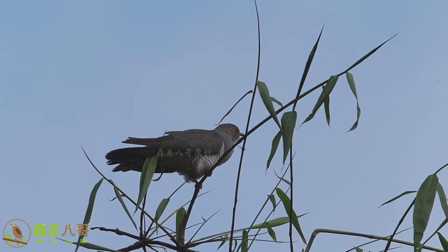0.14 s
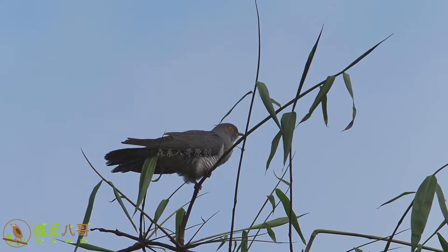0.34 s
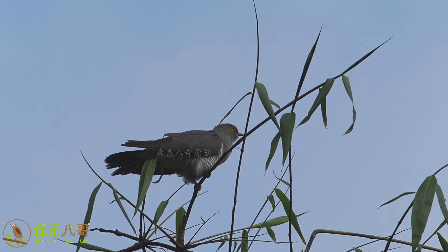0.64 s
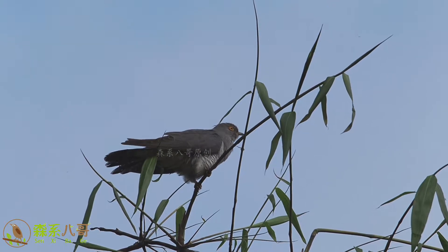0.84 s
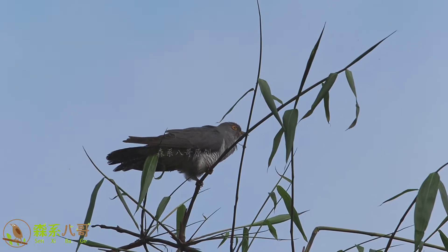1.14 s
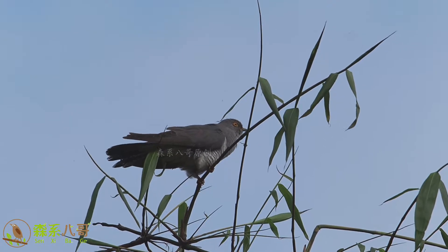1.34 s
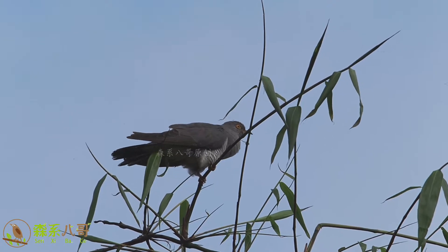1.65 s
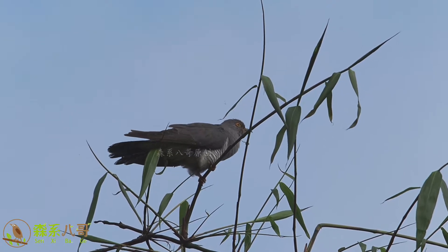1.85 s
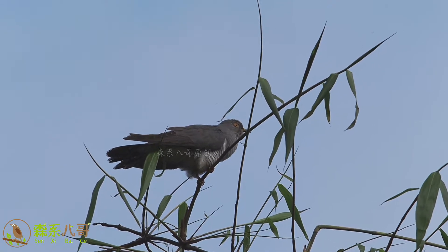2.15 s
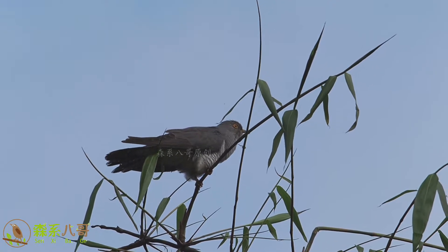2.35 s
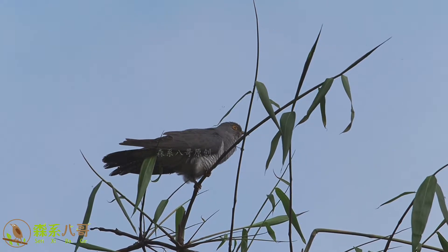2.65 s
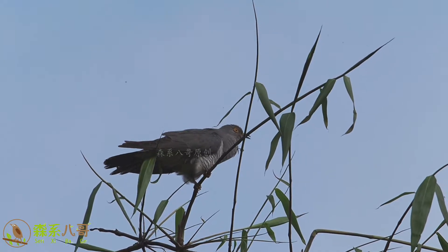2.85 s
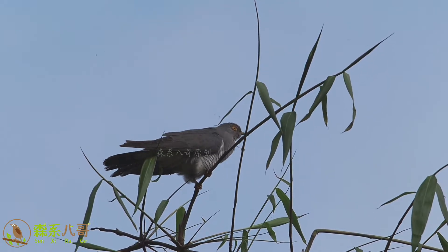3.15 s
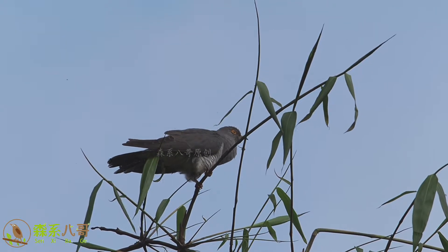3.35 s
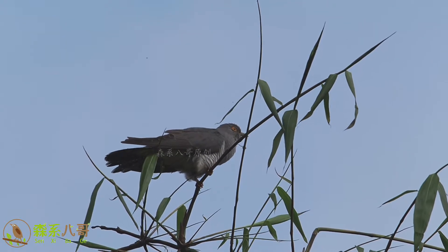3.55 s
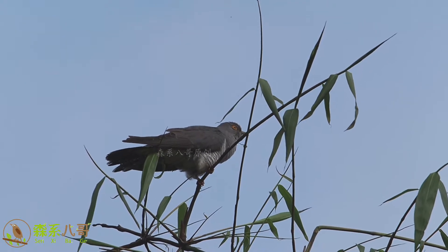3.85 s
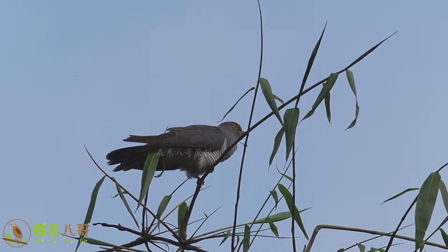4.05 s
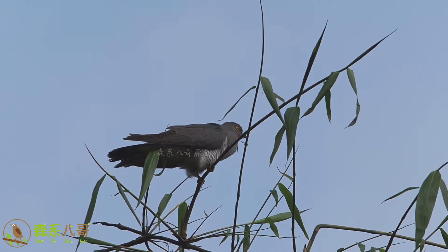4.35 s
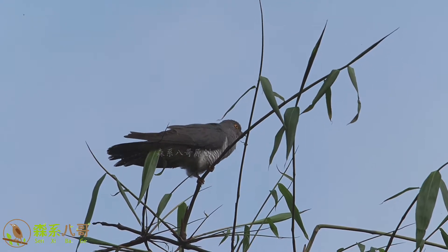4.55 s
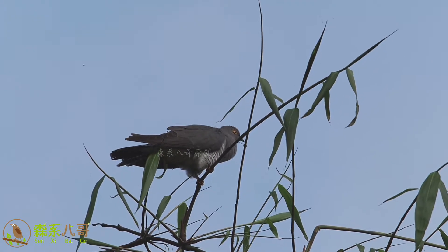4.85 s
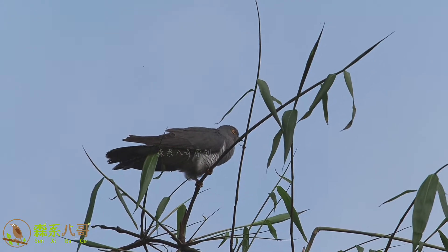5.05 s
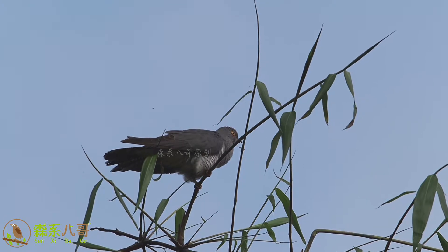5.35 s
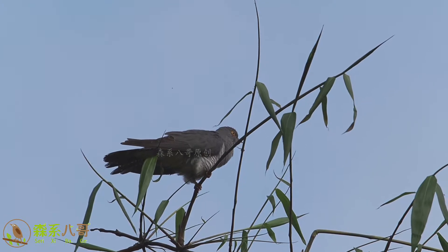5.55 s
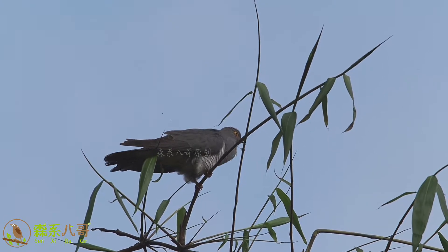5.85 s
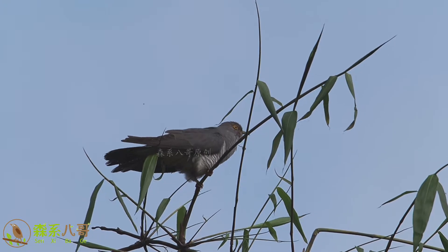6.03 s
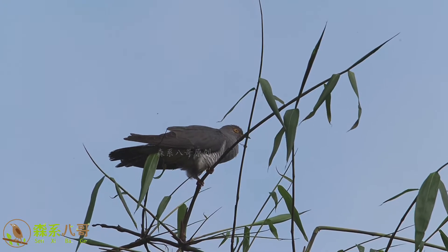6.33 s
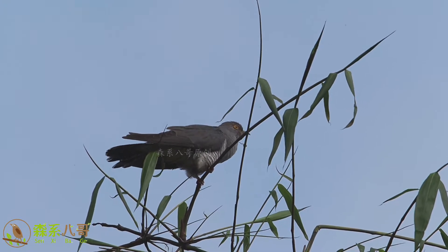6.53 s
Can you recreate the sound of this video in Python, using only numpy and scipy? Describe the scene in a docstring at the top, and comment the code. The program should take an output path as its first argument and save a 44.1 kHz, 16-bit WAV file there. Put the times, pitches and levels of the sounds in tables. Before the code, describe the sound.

Outdoors among reeds, a cuckoo calls four times, about every one and a half seconds: a short scooped higher note, then a lower, softer one, each with a slight echo. Behind it are a very quiet airy hush, faint insects and far small birds twittering and whistling. Near the end a closer bird gives a few sharp rising chips. The microphone hears the cuckoo clearly in front.

```python
"""Cuckoo over a reed bed

A cuckoo calls four times from a reed top: a scooped high note, then a lower, softer one; an earlier call still echoes.
Each note is a gliding, nearly pure tone; delayed copies interfere with it and late scattering leaves a short tail.
Far small birds whistle, chip and twitter as swept sines blurred by scattering, with hoarse calls of band noise.
Beneath lie shaped noises (a soft outdoor hush, a high hiss, an insect chorus) and a thin insect whine of sines."""
import sys
import numpy as np
from scipy import signal
from scipy.fft import rfft, irfft
from scipy.io import wavfile

SR = 44100
rng = np.random.default_rng(int(sys.argv[2]) if len(sys.argv) > 2 else 0)


def generate_wav(sig):
    """Save sig (samples, or channels by samples) to the path in sys.argv[1] as 16-bit PCM at SR."""
    pcm = np.round(np.clip(np.atleast_2d(sig).T, -1, 1) * 32767).astype(np.int16)
    wavfile.write(sys.argv[1], SR, pcm)


N = 295029
TIME = np.arange(N) / SR


def from_db(db):
    """Logarithmic level: 20 dB is a tenfold amplitude."""
    return 10 ** (np.asarray(db) / 20)


def rms_one(x):
    """Normalisation: divide by the root mean square to reach unit power."""
    return x / np.sqrt(np.mean(x ** 2) + 1e-20)


def progress(length_s):
    """Normalised time: from 0 to 1 over a note's length."""
    return np.linspace(0, 1, max(8, round(length_s * SR)))


def at_hz(points, hz):
    """Logarithmic frequency scale: interpolate a curve evenly per octave."""
    known_hz, values = np.transpose(points)
    return np.interp(np.log(hz + 1e-3), np.log(known_hz), values)


def wander(rate_hz, size=N):
    """Random modulation: straight lines between random knots, rate_hz knots a second, scaled to unit power."""
    steps = np.arange(size) / SR * rate_hz
    knots = rng.standard_normal(16384)
    return rms_one(np.interp(steps, np.arange(len(knots)), knots))


def band_noise(noise, order, low_hz, high_hz):
    """Resonance: a band-pass filter keeps one region of a noise."""
    band = signal.butter(order, [low_hz, high_hz], "band", fs=SR, output="sos")
    return signal.sosfilt(band, noise)


def stereo_noise(spectrum):
    """Interaural correlation: sum and difference of two noises set how alike the ears are at each frequency."""
    # likeness of left and right: frequency_hz, correlation
    likeness = [(40, 0.74), (130, 0.28), (290, 0.29), (640, 0.59), (1400, 0.21), (2300, 0.079),
                (3100, -0.27), (6800, -0.071), (15000, 0.07)]
    hz = np.arange(N // 2 + 1) * SR / N
    # the level falls steeply beyond the ends of the spectrum
    outside = np.log((hz + 1) / np.clip(hz + 1, spectrum[0][0], spectrum[-1][0]))
    gain = from_db(at_hz(spectrum, hz) - 120 * abs(outside))
    alike = np.clip(at_hz(likeness, hz), -1, 1)
    mid, side = rfft(rng.standard_normal((2, N)))
    common = np.sqrt(1 + alike) * mid
    opposed = np.sqrt(1 - alike) * side * [[1], [-1]]
    return rms_one(irfft(gain * (common + opposed), N))


def scatter(x, t60_s, build_s=0.0083):
    """Diffuse reverberation: countless weak reflections from reeds and trees build up, then decay by 60 dB per t60."""
    t = np.arange(SR) / SR
    build = np.minimum(t / build_s, 1) ** 2
    response = rng.standard_normal((2, SR)) * from_db(-60 * t / t60_s) * build  # different at each ear
    response /= np.sqrt(np.sum(response ** 2, axis=1, keepdims=True))
    return signal.fftconvolve(np.atleast_2d(x), response, axes=1)[:, :x.shape[-1]]


def from_aside(x, lag_ms):
    """Interaural delay: the right ear hears later by lag_ms, or earlier where it is negative."""
    left, right = np.broadcast_to(x, (2, N))
    return np.array([left, np.interp(TIME - lag_ms / 1000, TIME, right)])


def add(track, sound, onset_s):
    """Superposition: sum a sound into a track at its onset."""
    start = max(0, round(onset_s * SR))
    part = track[..., start:start + sound.shape[-1]]
    part += sound[..., :part.shape[-1]]


def hush():
    """Broadband ambience: noise weighted to low frequencies makes a soft outdoor hush."""
    # spectrum of the hush: frequency_hz, relative level_db_per_hz
    hush_spectrum = [(12, -23.5), (20, 0.5), (49, -2.5), (212, -10), (245, -6.5), (306, -11.5),
                     (339, -21.5), (391, -13.5), (520, -12), (553, -23.5), (651, -13.5), (939, -11.5),
                     (1630, -18), (2600, -20.5), (3380, -47), (5720, -120)]
    return from_db([[-54.85], [-55.16]]) * stereo_noise(hush_spectrum)


def hiss():
    """High-frequency noise: the hiss of the air and reeds."""
    # spectrum of the hiss: frequency_hz, relative level_db_per_hz
    hiss_spectrum = [(2180, -27), (3700, -1.5), (4200, -4.5), (4790, -2), (6580, -9), (8560, -5),
                     (9650, -11.5), (13100, -10.5), (15500, -18)]
    return from_db(-61.5) * stereo_noise(hiss_spectrum)


def insect_chorus():
    """Incoherent sum: a far insect chorus is heard as a narrow band of noise."""
    # spectrum of the chorus: frequency_hz, relative level_db_per_hz
    chorus_spectrum = [(2200, -55), (2600, -13.5), (2900, -3.5), (3080, 1.5), (3220, 5), (3420, 0),
                       (3650, -10.5), (4100, -34.5)]
    return from_db([[-59.5], [-61.5]]) * stereo_noise(chorus_spectrum)


def whine(flutter, waver):
    """Frequency and amplitude modulation: an insect holds one shrill, slightly unsteady note, in bouts."""
    # bouts of the whine: start_s, length_s, pitch_hz, level_db
    bouts = [(3.45, .26, 3264, -58), (3.77, 0.51, 3201, -54.5), (4.27, 0.294, 3220, -58.5),
             (4.53, 0.53, 3189, -52.5), (5.03, 0.72, 3190, -65.5)]
    edge_s = .03  # rise and fall of each bout
    tone = np.zeros(N)
    for start_s, length_s, pitch_hz, level_db in bouts:
        t = progress(length_s) * length_s
        hz = pitch_hz * (1 + waver * wander(199.2, size=len(t)))
        phase = 2 * np.pi * np.cumsum(hz) / SR
        gate = np.minimum(np.minimum(t, length_s - t) / edge_s, 1)
        steady = rms_one(np.sin(phase) * (1 + flutter * wander(60, size=len(t))))
        add(tone, from_db(level_db) * gate * steady, start_s)
    heard = from_aside(tone, lag_ms=0.1) + from_db(-8.5) * scatter(tone, t60_s=0.23)
    ear_gain_db = [[1], [-1]]  # left raised by 1 dB, right lowered by 1 dB
    return from_db(ear_gain_db) * heard


def rasps():
    """Filtered noise: hoarse far calls are blurred to a bell-shaped swell of noise in one resonance."""
    # calls: centre_s, half_length_s, pitch_hz, width_hz, level_db
    hoarse_calls = [(0.77, 0.11, 940, 600, -59), (1.29, 0.043, 1950, 251, -57.5),
                    (1.44, 0.026, 1720, 150, -57.5), (3.972, 0.041, 970, 254, -54.5),
                    (4.13, 0.093, 860, 158, -64.5), (4.882, 0.065, 1960, 300, -58.5),
                    (5.757, 0.051, 935, 200, -60)]
    out = np.zeros((2, N))
    for centre_s, half_s, hz, width_hz, level_db in hoarse_calls:
        white = rng.standard_normal(N) + 0.65 * rng.standard_normal((2, N))  # partly shared by the ears
        noise = band_noise(white, 2, hz - width_hz / 2, hz + width_hz / 2)
        swell = np.exp(-.5 * ((TIME - centre_s) / half_s) ** 2)
        out += from_db(level_db) * swell * rms_one(noise)
    return out


def glide(hz, crest, waver):
    """Phase is the integral of frequency; the swell peaks at the crest (share of the note's length)."""
    u = np.linspace(0, 1, len(hz))
    swell = np.sin(np.pi * np.interp(u, [0, crest, 1], [0, .5, 1]))
    unsteady_hz = hz * (1 + waver * wander(250.5, size=len(u)))
    return swell, 2 * np.pi * np.cumsum(unsteady_hz) / SR


def twitter(low_hz, high_hz, pan_db, count=1400):
    """Superposed random slurs: many far birds, blurred by diffuse scattering."""
    # loudness over time: time_s, level_db (mean of the two ears)
    twitter_level = [(0, -61.5), (.5, -63), (1.1, -65), (1.6, -60), (2.3, -63.5), (2.9, -64.5), (3.5, -61),
                     (3.9, -68.5), (6.69, -88)]
    flock = np.zeros(N)
    for when, length, pitch, bend, loud in rng.random((count, 5)):
        hz = low_hz * (high_hz / low_hz) ** pitch
        slur = .7 * (bend - .5) * (progress(0.01524 + .05 * length) - .5)  # up or down, share of the pitch
        swell, phase = glide(hz * (1 + slur), crest=0.38, waver=0.0145)
        add(flock, from_db(17 * loud) * swell * np.sin(phase), when * N / SR)
    level_db = np.interp(TIME, *np.transpose(twitter_level))
    balance_db = np.array([[pan_db / 2], [-pan_db / 2]])
    return from_db(level_db + balance_db) * rms_one(scatter(flock, t60_s=0.46))


def whistle_notes():
    """Exponential relaxation: each whistle slides quickly at first, then settles towards its final pitch."""
    # whistles: start_s, length_s, start_hz, final_hz, level_db, left_minus_right_db, scattered_share
    whistles = [(0, 0.29, 2460, 2420, -67, -2, .8), (0.045, 0.35, 5110, 4550, -65, 2, 0.7),
                (0.413, 0.14, 7420, 6920, -62.5, 9, 1), (.62, 0.26, 7130, 6600, -63.5, 2, 0.7),
                (1.246, 1, 7370, 7335, -68.5, 1, .7), (1.47, 0.29, 7120, 6930, -61, 2.5, 0.76),
                (2.071, 0.18, 4430, 4320, -60, 3.5, 0.54), (2.519, .1, 3710, 2754, -62, 4, .5),
                (2.957, 0.14, 8660, 7230, -62, 0, 1), (4.952, 0.28, 4600, 4990, -57.5, -5.5, 0.2),
                (5.329, .165, 4470, 4120, -59, -2, 0.54), (5.539, 0.17, 4520, 4110, -62.5, 1, .7),
                (5.73, .28, 8020, 7490, -58, 0, 0.42)]
    settle_s = 0.056  # time constant of the slide
    notes = []
    for start_s, length_s, start_hz, final_hz, level_db, pan_db, share in whistles:
        remaining = np.exp(-progress(length_s) * length_s / settle_s)
        hz = final_hz + (start_hz - final_hz) * remaining
        notes.append((start_s, hz, level_db, pan_db, share))
    return notes


def trill_notes(count=7):
    """Periodic repetition: a far bird's evenly spaced downslurs, each a little lower and fainter than the last."""
    start_s, period_s, length_s = 3.09, 0.099, 0.0536
    first_hz, step_hz, drop_hz = 7450, -78, 500  # mean pitch, change per note, fall within each note
    first_db, step_db, pan_db = -61, -2, 3
    scattered_share = .8  # heard mostly by way of the vegetation
    fall_hz = drop_hz * (.5 - progress(length_s))
    return [(start_s + k * period_s, first_hz + k * step_hz + fall_hz, first_db + k * step_db,
             pan_db, scattered_share) for k in range(count)]


def chip_notes():
    """Power-law sweep: a nearer bird's chips rise ever faster to their top pitch."""
    # chips: start_s, length_s, top_hz, level_db, left_minus_right_db
    chips = [(5.466, 0.071, 4960, -39, -1), (5.74, .092, 4580, -52.5, -2), (6.335, .09, 4906, -36, -1.5)]
    rise_hz_per_s, bend, scattered_share = 13500, 1.45, .24  # mean rise; power of its curve; share
    notes = []
    for start_s, length_s, top_hz, level_db, pan_db in chips:
        hz = top_hz - rise_hz_per_s * length_s * (1 - progress(length_s) ** bend)
        notes.append((start_s, hz, level_db, pan_db, scattered_share))
    return notes


def small_birds(notes, crest, steepness, waver, octave_db, t60_s):
    """Direct and diffuse sound: the power of each whistle is shared between a clear path and the vegetation."""
    direct, smeared = np.zeros((2, 2, N))
    for start_s, hz, level_db, pan_db, share in notes:
        swell, phase = glide(hz, crest, waver)
        tone = np.sin(phase) + from_db(octave_db) * np.sin(2 * phase)
        note = np.sqrt(2) * abs(swell) ** steepness * tone
        note = note * from_db([[level_db + pan_db / 2], [level_db - pan_db / 2]])
        add(direct, np.sqrt(1 - share) * note, start_s)
        add(smeared, np.sqrt(share) * note, start_s)
    return from_aside(direct, lag_ms=-0.086) + scatter(smeared, t60_s)


def cuckoo_note(pitch, level, buzz, rough, overtones, offset_hz, stretch):
    """Additive synthesis: a gliding, slightly hoarse tone with faint overtones and a trace of rasp and hiss."""
    # high resonances of the hiss: low_edge_hz, high_edge_hz, level_db
    sibilance = [(4800, 5100, 3), (7900, 10600, -6.5)]
    note_s, scoop_s = .3, .0238
    start_s = .006  # the voice catches in this time
    t = np.arange(round(note_s * SR)) / SR / stretch  # note's own time: a longer note runs slower
    held = t / level["hold_s"]

    # pitch scoops up from below, climbs, and sags ever faster as the air runs out
    sag_hz = pitch["sag_hz"] * np.minimum(held, 1.5) ** 4
    scoop_hz = pitch["scoop_hz"] * np.exp(-t / scoop_s) + pitch["catch_hz"] * np.exp(-t / start_s)
    hz = pitch["hz"] + offset_hz - scoop_hz + pitch["climb_hz_per_s"] * t - sag_hz
    phase = 2 * np.pi * np.cumsum(hz) / SR + rough["jitter_rad"] * wander(138.6, size=len(t))
    tone = np.sqrt(2) * np.sin(phase) * (1 + rough["shimmer"] * wander(169.9, size=len(t)))

    partials = sum(from_db(db) * np.sin(multiple * phase) for multiple, db in overtones)
    partials = partials * (1 + rough["flutter"] * wander(90.3, size=len(t)))
    white = rng.standard_normal(len(t))
    rasp = rms_one(band_noise(white, 3, 520, 1700))
    air = sum(from_db(db) * rms_one(band_noise(white, 1, low_hz, high_hz))
              for low_hz, high_hz, db in sibilance)
    edge = np.sqrt(2) * partials + from_db(buzz["rasp_db"]) * rasp + from_db(buzz["air_db"]) * air

    rise = np.sin(np.pi / 2 * np.minimum(t / level["attack_s"], 1)) ** level["attack_power"]
    attack = np.maximum(level["start_share"], rise)
    released_s = np.maximum(t - level["hold_s"], 0)

    def held_then_released(part):
        """Exponential decay: the level changes evenly in dB over the hold, then falls 60 dB per t60."""
        return from_db(part["db"] + part["swell_db"] * np.minimum(held, 1)
                       - 60 * released_s / part["release_t60_s"])

    fade = np.minimum(np.minimum(t, t[-1] - t) / start_s, 1)
    return fade * (attack * held_then_released(level) * tone + held_then_released(buzz) * edge)


def cuckoo(tail_db, tail_t60_s):
    """Multipath interference: delayed copies of the gliding notes add and cancel; far trees return a late tail."""
    # first notes and second notes: start_s, pitch_offset_hz, effort_db, length_factor
    first_notes = [(1.2448, -2.0, -0.5, 1.02), (2.904, -1.3, 0.0, 1), (4.423, 1.5, 0.5, 0.996),
                   (5.9118, 1.86, -0.0, 1)]
    second_notes = [(-0.34, 0.5, -1, 1.03), (1.5914, -4, -2, 1.22), (3.2537, 1.0, 0, 0.96),
                    (4.7762, 2.1, 0.4, 0.914), (6.2692, 2.3, 0.1, 0.93)]
    # overtones: multiple, level_db (relative to the buzz); half multiples come from slightly alternating cycles
    first_overtones = [(2, -2), (3, -19.5), (4, -20)]
    second_overtones = [(1.5, -7), (2, -0.5), (2.5, -12.5), (3, -3.5), (4, -14)]
    # paths from the cuckoo, the direct one first: delay_ms, right_ear_lag_ms, left_db, right_db
    paths = [(0.0, -0.063, 0.0, -0.66), (8.044, -0.12, -1.6, -3), (13.1, -0.17, -12.5, -17),
             (37.61, 0.005, -14.5, -16.5), (52.93, -0.13, -4, -8), (73.86, -0.14, -9.5, -18),
             (91.94, -0.18, -13.5, -16), (150.6, 0.39, -27, -19.5), (174.9, 0.13, -22.5, -19.5),
             (195.77, 0.16, -21.6, -20.0), (237.85, 0.1, -26.5, -25)]
    # times and rates are for a length factor of 1; the first note swells over its hold, the second fades
    # buzz: rasp_db and air_db are relative to its own level
    # roughness: early or late cycles (radians), uneven strength and overtone flutter (shares)
    first_voice = (
        dict(hz=701, scoop_hz=156.8, catch_hz=130, climb_hz_per_s=139.7, sag_hz=14.06),
        dict(db=-32, start_share=0.25, attack_s=.0327, attack_power=8.4, hold_s=.1083, swell_db=10,
             release_t60_s=0.15),
        dict(db=-54, swell_db=.5, release_t60_s=.45, rasp_db=-4.5, air_db=-11),
        dict(jitter_rad=.1, shimmer=.1, flutter=.45),
        first_overtones)
    second_voice = (
        dict(hz=540.6, scoop_hz=0, catch_hz=40, climb_hz_per_s=249.8, sag_hz=33.3),
        dict(db=-22.8, start_share=.1, attack_s=.0415, attack_power=1.4, hold_s=.1747, swell_db=-20.2,
             release_t60_s=.169),
        dict(db=-63.5, swell_db=4.5, release_t60_s=0.21, rasp_db=-15, air_db=-5.5),
        dict(jitter_rad=.05, shimmer=.036, flutter=.2),
        second_overtones)

    lead_s = .5  # room for a note sung before time zero, so that its echoes are heard
    lead = round(lead_s * SR)
    voice = np.zeros(N + lead)
    for notes, note_voice in ((first_notes, first_voice), (second_notes, second_voice)):
        for start_s, offset_hz, effort_db, stretch in notes:
            note = cuckoo_note(*note_voice, offset_hz, stretch)
            add(voice, from_db(effort_db) * note, start_s + lead_s)

    t = np.arange(-lead, N) / SR
    heard = from_db(tail_db) * scatter(voice, tail_t60_s, build_s=0.093)[:, lead:]
    for delay_ms, lag_ms, left_db, right_db in paths:
        heard[0] += from_db(left_db) * np.interp(TIME - delay_ms / 1000, t, voice)
        heard[1] += from_db(right_db) * np.interp(TIME - (delay_ms + lag_ms) / 1000, t, voice)
    return heard


def scene():
    """Linear superposition: the cuckoo in front, everything else behind it."""
    background = hush() + hiss()
    insects = insect_chorus() + whine(flutter=.35, waver=0.0046)
    far = rasps() + twitter(low_hz=3865, high_hz=6870, pan_db=2.5)
    whistles = small_birds(whistle_notes() + trill_notes(), crest=0.28, steepness=0.14, waver=0.0126,
                           octave_db=-51, t60_s=0.57)
    chips = small_birds(chip_notes(), crest=0.89, steepness=3.4, waver=0.02, octave_db=-22, t60_s=0.45)
    caller = cuckoo(tail_db=-17, tail_t60_s=1.55)
    return background + insects + far + whistles + chips + caller


def record(dry):
    """Low-pass filtering: an elliptic filter cuts the top steeply."""
    cutoff_hz = 15700
    return signal.sosfilt(signal.ellip(12, .1, 80, cutoff_hz, fs=SR, output="sos"), dry)


dry = scene()
out = record(dry)
generate_wav(out)
```